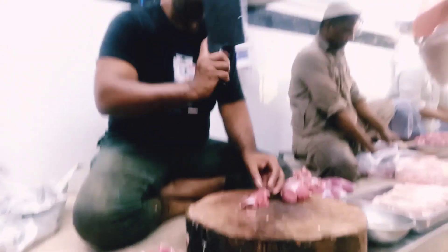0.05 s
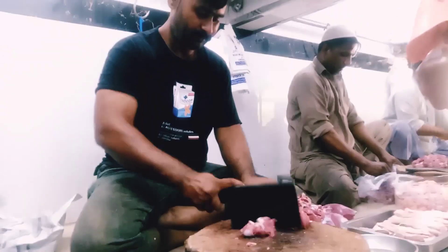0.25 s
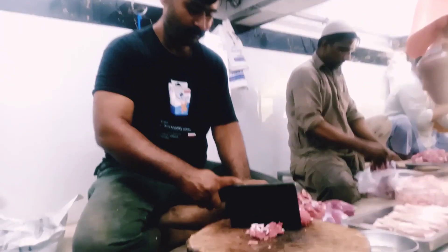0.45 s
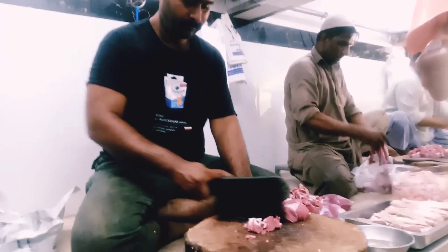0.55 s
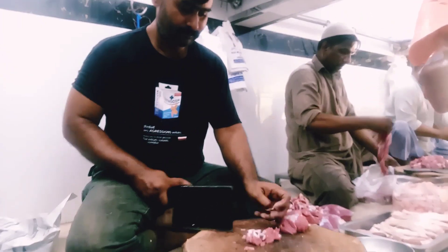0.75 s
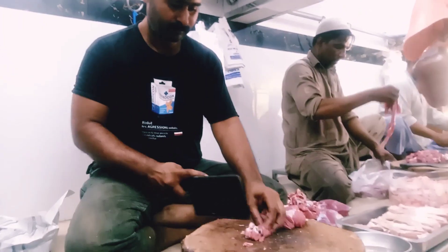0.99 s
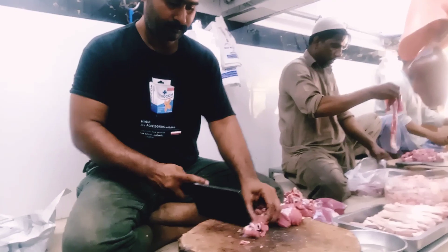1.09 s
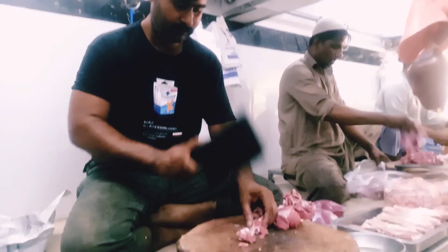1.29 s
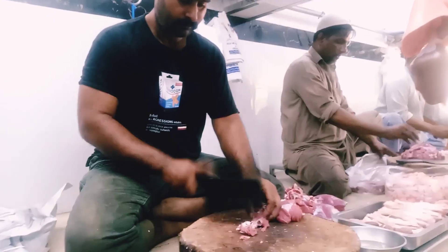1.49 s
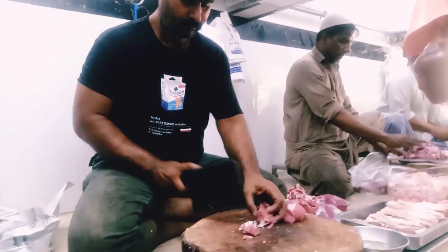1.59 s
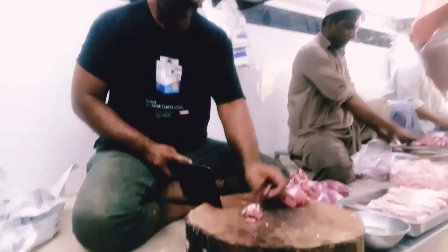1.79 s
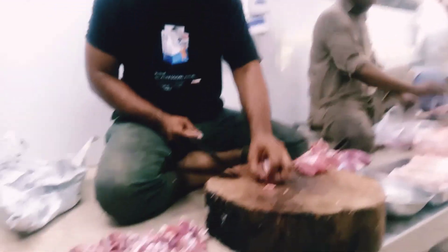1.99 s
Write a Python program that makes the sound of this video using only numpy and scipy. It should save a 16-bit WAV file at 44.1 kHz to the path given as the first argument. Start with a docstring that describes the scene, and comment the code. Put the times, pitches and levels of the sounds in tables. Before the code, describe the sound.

Cleaver chops on wooden log blocks: a loud near crack and thud, a farther crunching blow with lighter knocks, two more near chops, the last much softer, then faint blade ticks; small echoing shop, low hum.

```python
"""Two butchers chop lamb with cleavers on log blocks in a small, hard-walled shop.
Throughout, sine lines hum like a machine over shaped noise: room rumble and a fan's rush.
A near cleaver cracks bone and thuds home: modes, noise and low bumps. A further one strikes, mostly
room noise, with crunching fibres and a lighter after-knock, then strikes again. The near one lands
twice more, the last much softer, and short noise bursts tick as the blade is laid down."""
import sys
import numpy as np
from scipy import signal
from scipy.fft import rfft, irfft, next_fast_len
from scipy.io import wavfile
from scipy.ndimage import uniform_filter1d, map_coordinates

SR = 44100
rng = np.random.default_rng(int(sys.argv[2]) if len(sys.argv) > 2 else 0)


def output_pcm(signal):
    """Save a mono or channel-first signal as 16-bit PCM at the path in sys.argv[1].

    Samples are clipped to [-1, 1] before scaling.
    """
    pcm = np.clip(np.atleast_2d(signal).T, -1, 1) * 32767
    wavfile.write(sys.argv[1], SR, np.round(pcm).astype(np.int16))


N = 90404  # length in samples
T = np.arange(SR * 3 // 4) / SR  # time within one event, s
TOP_HZ, FADE_S = 16800, 0.004  # band limit and edge fades of the whole scene

# --- Bed: hum, rumble and air
# lowest hum line over time, before HUM_DB: t/s, level/dB
HUM_LEVEL = [(0.0, -33), (0.15, -37.5), (0.24, -52), (0.36, -26), (0.5, -53.5), (0.62, -35.5),
             (0.77, -44.5), (0.92, -31.5), (1.13, -42), (1.41, -48), (1.64, -33), (1.93, -45.5),
             (2.05, -37.5)]
# other hum lines, mean level: f/Hz, level/dB
HUM_LINES = [(145, -44.5), (204.6, -45), (247, -43), (350, -49.5), (791, -58.5)]
HUM_HZ, HUM_DB = 104.1, 3  # lowest line and its lift
HUM_WAVER_DB, HUM_DRIFT_RAD = 5, 1.5  # scale of the other lines' level waver; of every line's phase drift
# rumble over time, before its waver: t/s, level/dB
RUMBLE_LEVEL = [(0, -34), (.5, -38), (1.25, -34.5), (1.8, -32), (2.05, -37.5)]
# rumble colour: f/Hz, level/dB
RUMBLE_COLOUR = [(25, -41), (43, -11.5), (58, -20), (80, -5), (130, -3.5), (290, -5), (450, -11),
                 (640, -30), (3000, -96)]
# fan rush colour: f/Hz, level/dB
AIR_COLOUR = [(200, -17), (450, 4.5), (990, -3.5), (1400, -11), (1900, -16), (2600, -26.5), (3300, -38.5),
              (6000, -44.5), (9000, -53.5), (14000, -49), (15200, -47.5), (16500, -49)]
RUMBLE_WAVER_DB, AIR_DB, AIR_WAVER_DB = 0.7, -45, 0.8

# --- Room
# decay of the reflections: f/Hz, t60/s
SHOP_T60 = [(60, 1), (200, 0.67), (500, 0.36), (1000, 0.37), (2500, 0.31), (5000, 0.22), (9000, 0.13),
            (16000, 0.082)]
SHOP_RISE_S, SHOP_HOLD_S = 0.0019, 0.015  # reflections build up, hold, then die
NEAR_HOLD_S = 0.026  # hold for near blows and crunches
SHOP_PATCHY_DB = 7  # unevenness of the reflections, full only in the high treble
# late bass colour: f/Hz, level/dB
BOOM_COLOUR = [(25, -24), (45, -10), (92, 1.5), (130, 1), (200, -21), (2000, -91)]
BOOM_S, BOOM_T60, BOOM_NEAR_DB, BOOM_FAR_DB = 0.0515, 0.55, 18, 26.5  # delay, decay in s, gains

# --- Small contacts
# blade ticks, before TICK_DB: t/s, level/dB, direct t60/s, room against direct level/dB
TICKS = [(1.946, -16, 0.046, 3), (1.9738, -2, 0.015, 1), (1.985, -10, .05, -2)]
# tick colour: f/Hz, level/dB
STEEL_COLOUR = [(200, -3), (500, 18), (2000, 7.5), (4300, -14.5), (6000, -13), (7200, -20), (8200, -37.5),
                (13000, -40), (15000, -19.5), (16500, -40.5)]
TICK_DB = -14.5
# bone cracks: t/s, level/dB, direct t60/s, room against direct level/dB
CRACKS = [(0.2402, -9.5, .03, -10), (0.2427, -4, 0.03, -1.5), (0.2490, -4.5, 0.02, 0.5),
          (0.2715, -13, 0.056, 8.5), (0.628, -20.5, 0.069, 4), (1.5400, -24, 0.03, -13)]
# crack colour: f/Hz, level/dB
BONE_COLOUR = [(200, -17), (900, 26), (3000, 2), (5000, -8.5), (6500, -8.5), (8200, -27), (9300, -21),
               (13800, -27), (15000, -15.5), (16200, -35.5)]

# --- Cutting
# the edge crunching through meat and gristle: t/s, spread/s, level/dB
CRUNCHES = [(0.63, 0.055, -4.5), (1.537, 0.039, -16.5), (1.752, 0.02, -33.5)]
# crunch colour: f/Hz, level/dB
GRISTLE_COLOUR = [(200, -12.5), (600, 10), (1200, 16.5), (2100, 15.5), (2800, 6), (3600, -4), (6000, -17.5),
                  (9000, -42)]
FIBRES_PER_S, CRUNCH_ROOM_DB = 1000, -4  # mean snap rate at the start; room against direct
# thin steel notes as a blade slides on: t/s, length/s, f/Hz, level/dB
SQUEAKS = [(0.708, 0.061, 4000, -59.5), (0.745, 0.062, 2700, -55.5), (0.970, 0.048, 2620, -49.5),
           (1.028, 0.06, 2630, -66)]
# scale of the phase unsteadiness in rad; its random knots a second
SQUEAK_FLUTTER_RAD, BLADE_FLUTTER_RAD, FLUTTER_RATE = 0.65, 1.2, 130

# --- Far cleaver
# blows: t/s, level/dB, smack brightness f/Hz, weight on the log level/dB, smack's room hold/s
FAR_CHOPS = [(0.6307, 4.5, 4300, -0.5, 0.031), (0.702, -16, 2240, 4, .005), (0.9674, -11, 2470, 8, .008)]
# far log modes: f/Hz, level/dB, t60/s
FAR_LOG = [(214.6, -20.5, 0.39), (264.8, -26.5, 0.32), (342, -21, 0.35), (520, -21.5, 0.12),
           (611, -24.5, .16)]
# log thump colour: f/Hz, level/dB
FAR_THUMP_COLOUR = [(40, -37), (100, -10), (170, 3.5), (240, 3.5), (330, 2), (560, -0.5), (740, -12.5),
                    (1100, -19), (3000, -66.5), (16000, -93)]
# edge smack colour: f/Hz, level/dB
FAR_SMACK_COLOUR = [(100, -17.5), (500, -0.5), (760, 2), (1040, 3.5), (1400, -6.5), (2200, -13),
                    (3500, -29.5), (6000, -36), (8500, -35), (16000, -32.5)]
FAR_SMACK_DB, FAR_THUMP_DB = 22.5, 31.5
FAR_T60, FAR_DIRECT_DB, FAR_DIRECT_HZ = 0.054, -10, 2200  # direct sound: decay in s, level, dulled corner
FAR_ROCK_S, FAR_ROCK_HZ, FAR_ROCK_DB, FAR_ROCK_PEAK_S = 0.0363, 95.4, -27, 0.033  # the log rocks on the floor

# --- Near cleaver
# blows: t/s, level/dB, thud f/Hz, contact brightness f/Hz, room level/dB, weight on the log level/dB,
# rebound delay t/s, rebound f/Hz, rebound level/dB
CHOPS = [(0.2449, 0, 180, 3400, -2.5, 0.5, 0.0295, 161.4, -6),
         (1.5391, -4, 165, 2137, 0, 2.5, 0.028, 150, -7),
         (1.7488, -17, 242, 1397, 3, 10, 0.0285, 200, -14.5)]
# edge impact colour: f/Hz, level/dB
IMPACT_COLOUR = [(60, -20), (300, -27.5), (900, 7), (1500, -7), (3000, -25.5), (6000, -32.5), (16000, -13)]
# colour of the walls' answer to it: f/Hz, level/dB
WASH_COLOUR = [(40, -31), (90, -28), (165, 15), (250, 8.5), (380, 12.5), (560, 1), (800, 2), (1050, -0.5),
               (1400, -22), (2800, -28.5), (4500, -43), (6400, -44.5), (8000, -52.5), (16000, -45)]
# slow-swelling log modes, before the edge lodges: f/Hz, level/dB, t60/s, rise/s
LOG_MODES = [(370.7, 2, 0.18, 0.015), (561, -14.5, 0.08, 0.006)]
# knock of the block's face: f/Hz, level/dB, t60/s
FACE_MODES = [(785, -5, 0.029), (1016, -8.5, 0.066), (1040, -27, 0.04), (1261, -17, 0.023)]
# near blade notes: f/Hz, level/dB, t60/s
BLADE_MODES = [(2163, -34.5, 0.14), (2670, -32.5, 0.077), (3170, -45, 0.061), (3870, -51.5, 0.12)]
# lingering room modes: f/Hz, level/dB, t60/s
STANDING_MODES = [(145.3, -26, 1), (183.7, -20.5, 0.41), (239.2, -17.5, 0.76), (355, -29.5, 0.96),
                  (432, -22, 0.66), (1054, -31.5, 0.5)]
BITE_S, DAMP_S, DAMP_DB = 0.02, 0.0022, -24.5  # the edge lodges: when, how abruptly, how much the log drops
IMPACT_DB, IMPACT_T60, WASH_DB = 0.5, 0.067, 29
WALL_S = 0.012  # delay of the walls' answer
STRIKE_RISE_S, STANDING_RISE_S = 0.0008, 0.029  # rise of struck modes and of room modes
BLADE_TOP_HZ = 3600  # meat muffles the blade above this
THUD_DB, THUD_PEAK_S = -8.5, 0.0098  # the log bumps on the floor
REBOUND_PEAK_S = 0.011  # then rocks back, round and low


def amp(db):
    """Decibels to gain."""
    return 10 ** (np.asarray(db) / 20)


def along(points, hz):
    """(Hz, value) points read on a log axis."""
    f, v = np.transpose(points)
    return np.interp(np.log(hz + 1), np.log(f + 1), v)


def wobble(rate):
    """A smooth random curve, rate knots a second."""
    knots = rng.standard_normal(320)
    return map_coordinates(knots, [np.arange(N) * rate / SR], mode="mirror")


def colour(x, gain):
    """Filter x causally (minimum phase, so nothing smears ahead of a blow) to a gain per frequency."""
    m = 2 * next_fast_len(len(x))
    target = np.maximum(gain(np.fft.rfftfreq(m, 1 / SR)), 1e-6)
    cepstrum = irfft(np.log(target), m)
    # fold the cepstrum onto positive time
    cepstrum[1:m // 2] *= 2
    cepstrum[m // 2 + 1:] = 0
    response = np.exp(rfft(cepstrum))
    return irfft(rfft(x, m) * response, m)[:len(x)]


def shaped(x, spectrum):
    """Colour x by a (Hz, dB) curve."""
    return colour(x, lambda hz: amp(along(spectrum, hz)))


def soften(x, corner_hz, order=2):
    """Low-pass: a softer contact is duller."""
    return colour(x, lambda hz: (1 + (hz / corner_hz) ** (2 * order)) ** -.5)


def decay(t, t60):
    """A gain that falls 60 dB in t60 seconds."""
    return np.exp(-np.log(1000) * t / t60)


def rush(spectrum):
    """Steady coloured noise of rms 1."""
    x = shaped(rng.standard_normal(N + len(T)), spectrum)[-N:]  # drop the filter's run-in
    return x / x.std()


def burst(t60):
    """A short, decaying noise crunch of energy 1."""
    x = rng.standard_normal(len(T)) * decay(T, t60)
    return x / np.linalg.norm(x)


def ring(hz, db, t60, rise):
    """One struck mode: a decaying sine with a softened onset."""
    return amp(db) * np.sin(2 * np.pi * hz * T) * decay(T, t60) * (1 - np.exp(-T / rise))


def struck(modes, rise):
    """A set of modes rung together."""
    return sum(ring(hz, db, t60, rise) for hz, db, t60 in modes)


def rock(hz, peak_s):
    """A soft thump that swells to peak_s and fades within a few cycles."""
    u = T / peak_s
    return np.sin(2 * np.pi * hz * T) * u ** 2 * np.exp(1 - u ** 2)


def flutter(hz, depth):
    """A steel note made unsteady by the meat that rubs on it."""
    return np.sin(2 * np.pi * hz * T + depth * wobble(FLUTTER_RATE)[:len(T)])


def add(out, s, x):
    """Mix x into out at time s."""
    part = out[round(s * SR):][:len(x)]
    part += x[:len(part)]


def hum_line(t, hz, db):
    """One machine tone whose phase drifts; db sets its rms."""
    phase = 2 * np.pi * hz * t + HUM_DRIFT_RAD * wobble(11)
    return amp(db) * np.sqrt(2) * np.sin(phase)


def background():
    """Wavering machine hum over the rumble of the shop and an even rush of air."""
    t = np.arange(N) / SR
    hum = hum_line(t, HUM_HZ, HUM_DB + np.interp(t, *np.transpose(HUM_LEVEL)))
    for hz, db in HUM_LINES:
        hum += hum_line(t, hz, db + HUM_WAVER_DB * wobble(4))
    rumble_db = np.interp(t, *np.transpose(RUMBLE_LEVEL)) + RUMBLE_WAVER_DB * wobble(5.5)
    rumble = amp(rumble_db) * rush(RUMBLE_COLOUR)
    air = amp(AIR_DB + AIR_WAVER_DB * wobble(10)) * rush(AIR_COLOUR)
    return hum + rumble + air


def shop(hold=SHOP_HOLD_S):
    """A fresh, uneven room tail of energy 1 that builds, holds and dies, the treble first."""
    hz, t, z = signal.stft(rng.standard_normal(len(T)), SR, nperseg=256)
    # blurred random patches in time and frequency: clusters of reflections
    patches = uniform_filter1d(rng.standard_normal(z.shape), size=2, axis=0)
    patches = uniform_filter1d(patches, size=9, axis=1)
    treble = hz[:, None] / (hz[:, None] + 1500)
    clusters = amp(SHOP_PATCHY_DB * treble * patches / patches.std())
    fall = decay(np.maximum(t - hold, 0), along(SHOP_T60, hz)[:, None])
    tail = signal.istft(z * fall * clusters, SR, nperseg=256)[1][:len(T)]
    tail = tail * (1 - np.exp(-T / SHOP_RISE_S))
    return tail / np.linalg.norm(tail)


def boom():
    """The bass that the room returns late: long, low noise."""
    return shaped(burst(BOOM_T60), BOOM_COLOUR)


def snaps(rows, spectrum):
    """Short bright contacts: noise bursts with their room tails."""
    out = np.zeros(N)
    for s, db, t60, room_db in rows:
        contact = burst(t60) + amp(room_db) * shop()
        add(out, s, amp(db) * shaped(contact, spectrum))
    return out


def blade_ticks():
    """The blade laid down: light contacts of steel."""
    return amp(TICK_DB) * snaps(TICKS, STEEL_COLOUR)


def bone_cracks():
    """Bone giving way in abrupt, bright snaps."""
    return snaps(CRACKS, BONE_COLOUR)


def cutting():
    """Fibres snap in a quick, thinning run under the edge; the sliding steel sings faintly."""
    out = np.zeros(N)
    for s, length, db in CRUNCHES:
        snapping = rng.random(len(T)) < FIBRES_PER_S / SR
        fibres = snapping * rng.standard_normal(len(T)) * np.exp(-(T / length) ** 2)
        fibres = fibres / (np.linalg.norm(fibres) + 1e-12)
        room = signal.fftconvolve(fibres, shop(NEAR_HOLD_S))[:len(T)]
        add(out, s, amp(db) * shaped(fibres + amp(CRUNCH_ROOM_DB) * room, GRISTLE_COLOUR))
    for s, length, hz, db in SQUEAKS:
        swell = np.sin(np.pi * np.minimum(T / length, 1))
        add(out, s, amp(db) * swell * flutter(hz, SQUEAK_FLUTTER_RAD))
    return out


def far_direct():
    """The far blow's direct sound, weak and dulled."""
    return amp(FAR_DIRECT_DB) * soften(burst(FAR_T60), FAR_DIRECT_HZ, order=3)


def far_cleaver():
    """Distant blows, mostly room: a smack, the thump of the log as it rocks, then a low boom."""
    out = np.zeros(N)
    for s, db, bright_hz, weight_db, hold in FAR_CHOPS:
        smack = amp(FAR_SMACK_DB) * shaped(far_direct() + shop(hold), FAR_SMACK_COLOUR)
        smack = soften(smack, bright_hz, order=5)
        thump = amp(FAR_THUMP_DB) * shaped(far_direct() + shop(), FAR_THUMP_COLOUR)
        thump = thump + struck(FAR_LOG, STRIKE_RISE_S)
        add(out, s, amp(db) * (smack + amp(weight_db) * thump))
        add(out, s + FAR_ROCK_S, amp(db + FAR_ROCK_DB) * rock(FAR_ROCK_HZ, FAR_ROCK_PEAK_S))
        add(out, s + BOOM_S, amp(db + BOOM_FAR_DB) * boom())
    return out


def near_cleaver():
    """Blows ring blade and block; the lodging edge damps the log, which bumps and rocks; the room answers."""
    out = np.zeros(N)
    lodged = amp(DAMP_DB * (1 + np.tanh((T - BITE_S) / DAMP_S)) / 2)
    log = lodged * sum(ring(*mode) for mode in LOG_MODES)
    for s, db, thud_hz, bright_hz, room_db, weight_db, rebound_s, rebound_hz, rebound_db in CHOPS:
        edge = amp(IMPACT_DB) * shaped(burst(IMPACT_T60), IMPACT_COLOUR)
        blade = np.zeros(len(T))
        for hz, level, t60 in BLADE_MODES:
            blade += amp(level) * flutter(hz, BLADE_FLUTTER_RAD) * decay(T, t60)
        contact = soften(struck(FACE_MODES, STRIKE_RISE_S) + edge, bright_hz)
        knock = contact + soften(blade, BLADE_TOP_HZ, order=4)
        thud = amp(THUD_DB) * rock(thud_hz, THUD_PEAK_S)
        body = amp(weight_db) * (log + thud) + struck(STANDING_MODES, STANDING_RISE_S)
        add(out, s, amp(db) * (knock + body))
        wash = amp(WASH_DB + room_db) * shaped(shop(NEAR_HOLD_S), WASH_COLOUR)
        add(out, s + WALL_S, amp(db) * soften(wash, bright_hz))
        rebound = amp(weight_db + rebound_db) * rock(rebound_hz, REBOUND_PEAK_S)
        add(out, s + rebound_s, amp(db) * rebound)
        add(out, s + BOOM_S, amp(db + BOOM_NEAR_DB) * boom())
    return out


def scene():
    """Every layer summed at one microphone."""
    details = blade_ticks() + bone_cracks() + cutting()
    return (background() + details + far_cleaver() + near_cleaver())[None]


def record(dry):
    """Fade both ends softly and keep nothing above the band limit."""
    m = next_fast_len(N + SR // 2)
    to_edge = np.minimum(np.arange(N), np.arange(N)[::-1])
    fade = np.clip(to_edge / (FADE_S * SR), 0, 1)
    band = np.fft.rfftfreq(m, 1 / SR) < TOP_HZ
    return irfft(rfft(dry * fade, m) * band, m)[:, :N]


dry = scene()
out = record(dry)
output_pcm(out)
```